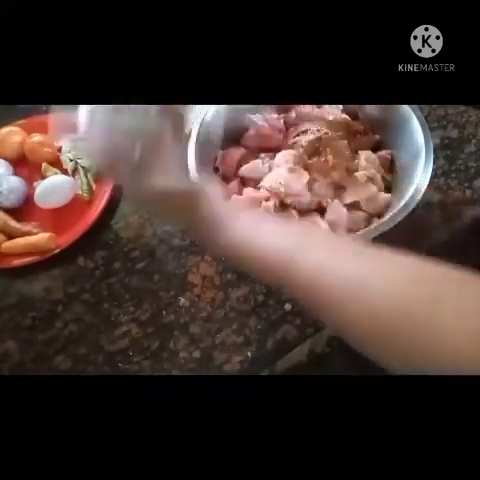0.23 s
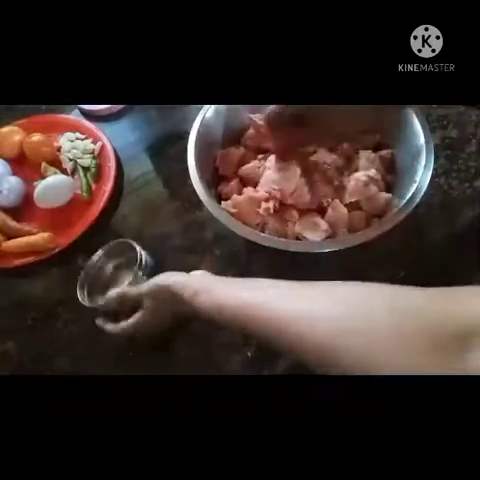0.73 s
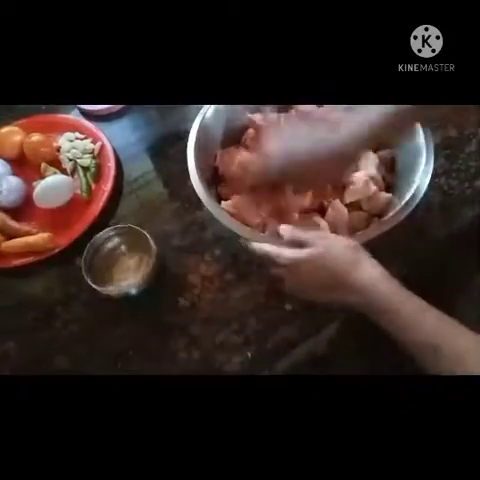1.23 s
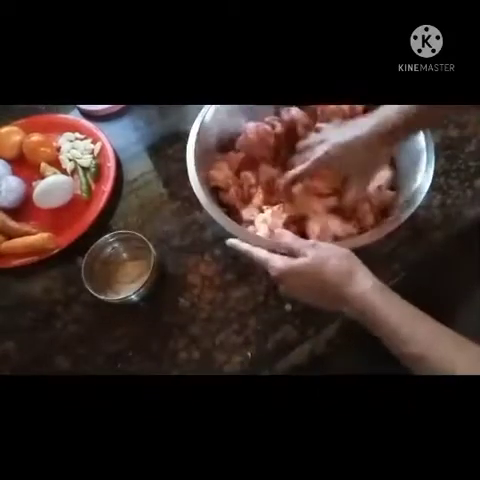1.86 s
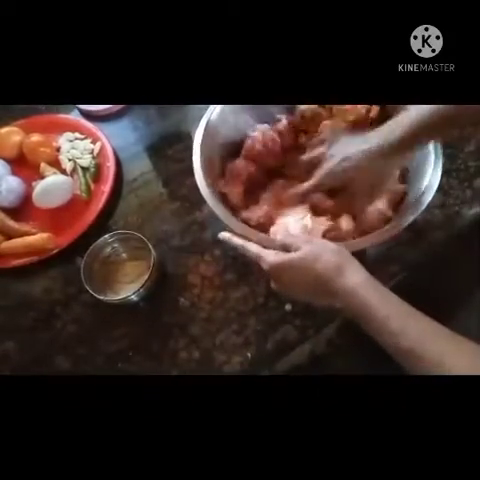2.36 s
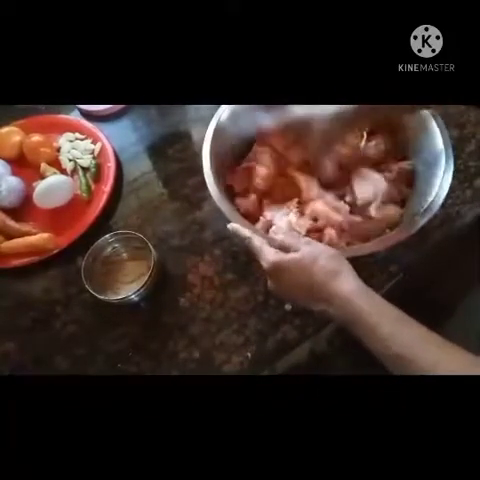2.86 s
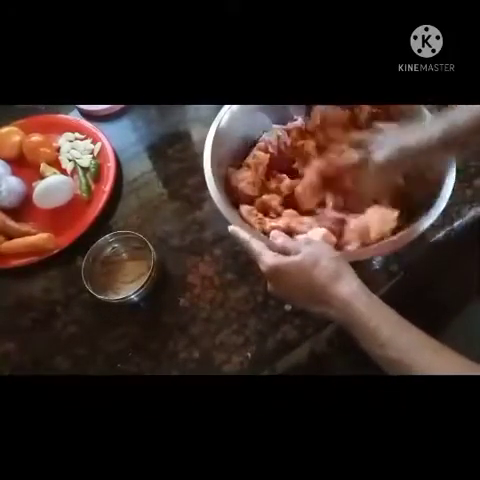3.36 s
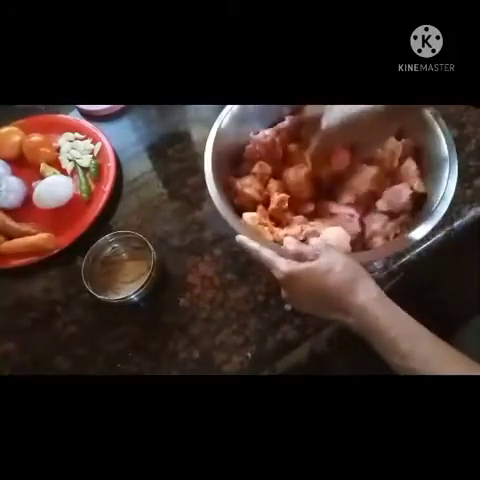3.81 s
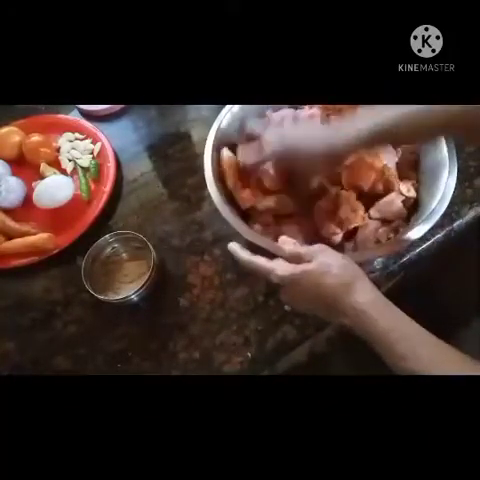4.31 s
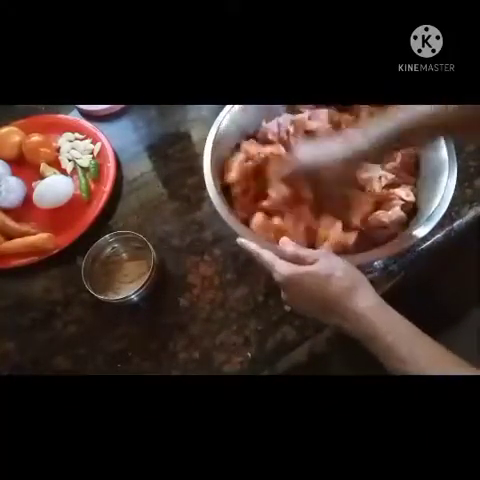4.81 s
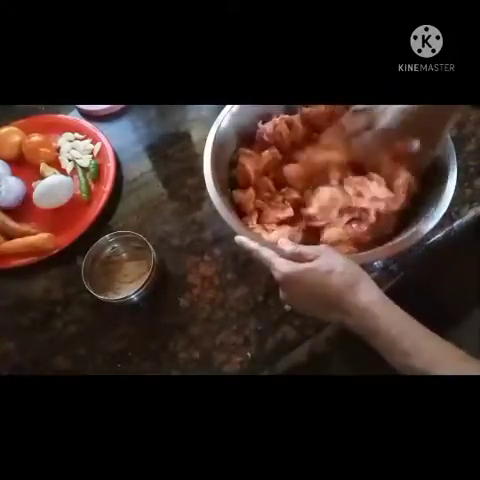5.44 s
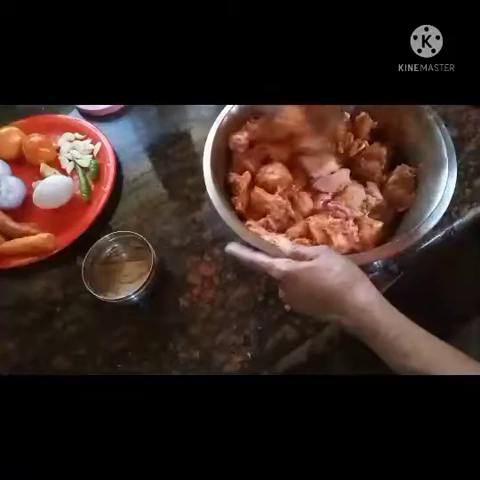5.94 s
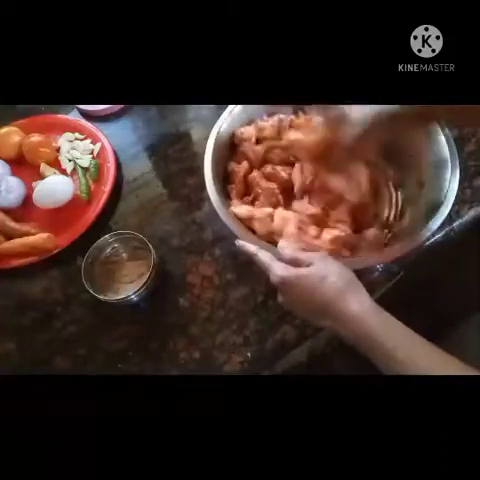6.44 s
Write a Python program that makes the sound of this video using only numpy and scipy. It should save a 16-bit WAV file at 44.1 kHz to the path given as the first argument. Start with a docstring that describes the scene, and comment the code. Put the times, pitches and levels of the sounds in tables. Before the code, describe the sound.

A small, hard-walled kitchen heard close to the counter, with quiet hiss and faint mains hum. At about 0.6 s come two little wet pops. At 0.82 s a steel dish hits stone with a loud, bright but short-ringing clang, bounces and chatters until 0.93 s, then scrapes on until 1.8 s, gritty and juddering with a wavering screech, catching harder around 1.5 to 1.77 s. From about 1.9 s hands work raw meat in wet paste: soft squishing, crackling bubbles, fizz, sticky slaps and rounded pops, in irregular strokes roughly two or three a second. Strong squelches fall near 2.4, 3.85, 4.85, 5.86 and 6.3 s. The heavy bowl gives a dull double knock around 5.76 s. A far engine fades in from 1.6 s, swelling briefly near 4.8 s, while low road rumble grows until 5.5 s and stays to the end.

```python
"""Kneading raw chicken

Raw chicken is mixed with wet paste by hand in a steel bowl on a stone counter, in a small hard-walled kitchen.
Two wet pops, then a steel dish clangs down and scrapes over the stone for a second: impacts and friction drive
its modes. The meat squelches and smacks stroke by stroke (ringing pockets, noise bursts); the bowl knocks dully.
Beneath lie hiss, mains hum, a far engine (wavering harmonics) and growing road rumble (filtered noise)."""
import sys
import numpy as np
from scipy import signal
from scipy.io import wavfile

SR = 44100
rng = np.random.default_rng(int(sys.argv[2]) if len(sys.argv) > 2 else 0)


def put_to_file(sound):
    """Save the sound as 16-bit audio at rate SR, in the file named by the first command-line argument."""
    columns = np.atleast_2d(sound).T  # one column per channel
    safe = np.clip(columns, -1, 1)
    whole_steps = np.round(safe * 32767)
    wavfile.write(sys.argv[1], SR, whole_steps.astype(np.int16))


N = 294147
T = np.arange(N) / SR


def from_db(db):
    """Decibels to amplitude gain."""
    return 10 ** (np.asarray(db) / 20)


def rms_one(x):
    """Scale to unit rms."""
    return x / np.sqrt(np.mean(x ** 2) + 1e-20)


def energy_one(x):
    """Scale to unit energy."""
    return x / np.sqrt(np.sum(x ** 2) + 1e-20)


def level_in_time(rows):
    """Interpolate (s, dB) rows to every sample."""
    s, db = np.transpose(rows)
    return np.interp(T, s, db)


def at_hz(points, hz):
    """Read (Hz, value) rows on a log-frequency axis."""
    f, value = np.transpose(points)
    return np.interp(np.log(np.maximum(hz, 1)), np.log(f), value)


def fade(t, t60):
    """Exponential decay by 60 dB in t60 seconds."""
    return np.exp(-np.log(1000) * t / t60)


def ramp(since_s, length_s):
    """Linear rise from 0 to 1, then hold."""
    return np.clip(since_s / length_s, 0, 1)


def add(out, s, sound):
    """Mix a short sound in at time s."""
    i = min(max(round(s * SR), 0), N)
    out[i:i + len(sound)] += sound[:N - i]


def through(x, response):
    """Convolve a signal with an impulse response."""
    return signal.oaconvolve(x, response)[:N]


def colour(spectrum, size=4096):
    """Minimum-phase, unit-energy response with the given spectrum."""
    hz = np.abs(np.fft.fftfreq(size, 1 / SR))
    log_gain = np.log(from_db(at_hz(spectrum, hz)))
    min_phase = np.exp(signal.hilbert(log_gain).conj())
    return energy_one(np.fft.ifft(min_phase).real[:size // 2])


def cut(x, hz, kind, order=2):
    """Butterworth low- or high-pass."""
    sos = signal.butter(order, min(hz, SR / 2 - 1), kind, fs=SR, output="sos")
    return signal.sosfilt(sos, x)


def drift(per_s):
    """Random curve: per_s unit-normal values a second, joined by straight lines."""
    return np.interp(T * per_s, np.arange(4096), rng.standard_normal(4096))


def grains(per_s, spread_db):
    """Random clicks of uneven size, unit rms."""
    sizes = from_db(spread_db * np.minimum(rng.exponential(1, N), 4))
    signs = rng.choice([-1, 1], N)
    return rms_one(sizes * signs * (rng.random(N) < per_s / SR))


def burst(t60, per_s, snap):
    """A contact lets go: one snap and a fading run of random clicks, unit energy."""
    t = T[:SR // 10]
    run = rng.standard_normal(len(t)) * (rng.random(len(t)) < per_s / SR) * fade(t, t60)
    run[0] = snap
    return energy_one(run)


# Kitchen decay. Each row: frequency in Hz, t60 in seconds.
KITCHEN_T60 = [(150, 0.87), (500, 0.34), (1400, 0.51), (3700, 0.21), (10000, 0.31)]


def kitchen(x, wet_db, count=9):
    """Hard walls return a dense noise tail, each band with its own decay; the lows last longest."""
    t = T[:SR * 2 // 3]
    edges_hz = np.geomspace(60, 18000, count + 1)
    tail = np.zeros(len(t))
    for low, high in zip(edges_hz, edges_hz[1:]):
        band = cut(cut(rng.standard_normal(len(t)), low, "high"), high, "low")
        tail += band * fade(t, at_hz(KITCHEN_T60, np.sqrt(low * high)))
    return x + from_db(wet_db) * through(x, energy_one(tail * ramp(t - .002, .0025)))


ENGINE_DB, ENGINE_START_S, ENGINE_RISE_S = -68.5, 1.57, 0.59
SWELL_S, SWELL_WIDTH_S, SWELL_DB = 4.8, .23, 13.5
ROAD_FAR_DB, ROAD_NEAR_DB = -73, -56
ROAD_APPROACH_S, ROAD_NEAR_S = 1.25, 5.45


def street_levels():
    """(engine dB, road dB): the engine rises 20 dB and swells once; traffic draws near, then stays."""
    running = np.clip((T - ENGINE_START_S) / ENGINE_RISE_S, .1, 1)
    swell_db = SWELL_DB * np.exp(-((T - SWELL_S) / SWELL_WIDTH_S) ** 2)
    engine_db = ENGINE_DB + 20 * np.log10(running) + swell_db
    return engine_db, np.interp(T, [ROAD_APPROACH_S, ROAD_NEAR_S], [ROAD_FAR_DB, ROAD_NEAR_DB])


ENGINE_HZ = 88.5
# Engine harmonics. Each row: multiple of ENGINE_HZ, relative level in dB.
ENGINE_ORDERS = [(1, -1), (2, -9), (3, -11.5), (4, -7)]
# Mains harmonics. Each row: frequency in Hz, rms level in dB.
MAINS = [(50, -94), (150, -79.5), (200, -78)]
# Spectra of road rumble and room hiss. Each row: frequency in Hz, relative level in dB per Hz.
ROAD_SPECTRUM = [(30, -31), (60, -6.5), (120, -3), (180, 4.5), (260, -1.5), (380, 6), (700, -3),
                 (1500, -46), (3000, -59)]
HISS_SPECTRUM = [(30, -17.5), (100, 5.5), (400, -12.5), (900, 0), (1450, -9), (2000, -8), (3200, -11.5),
                 (5200, -22), (7000, -14.5), (9000, -8.5), (11500, -29), (15500, -29)]


def background(hiss_db=-69):
    """Noise hiss, sine hum and engine harmonics that waver in pitch and level over filtered-noise rumble."""
    engine_db, road_db = street_levels()
    phase = 2 * np.pi * np.cumsum(ENGINE_HZ * (1 + 0.00588 * drift(6))) / SR
    engine, hum = np.zeros((2, N))
    for k, db in ENGINE_ORDERS:
        engine += np.sqrt(2) * from_db(db + 2.0 * drift(10)) * np.sin(round(k) * phase)
    for hz, db in MAINS:
        hum += np.sqrt(2) * from_db(db) * np.sin(2 * np.pi * hz * T)
    rumble = from_db(road_db) * through(rng.standard_normal(N), colour(ROAD_SPECTRUM))
    hiss = from_db(hiss_db) * through(rng.standard_normal(N), colour(HISS_SPECTRUM))
    return hiss + hum + rumble + from_db(engine_db) * engine


# Hand strokes. Each row: hardest squeeze in seconds, effort in relative dB, paste fizz in relative dB,
# build-up in seconds.
STROKES = [(1.99, -55.5, -59, .06), (2.44, -59, -56, .1), (2.79, -60, -54, .12), (3.33, -54, -58, .06),
           (3.57, -56, -52, .09), (3.82, -50, -59.5, .14), (4.26, -58.5, -61, .12), (4.45, -53, -60.5, .08),
           (4.84, -52, -65, .09), (5.39, -53.5, -61.5, .13), (5.8, -56, -59, .2), (6.3, -49, -52, .08),
           (6.62, -59, -66, .15)]
RELEASE_S = .09
REST_DB, REST_FIZZ_DB = -65.5, -68   # the hand keeps moving between strokes
KNEAD_START_S = 1.85


def stroke_levels():
    """(effort dB, fizz dB): bell-shaped squeezes sum in power over the resting level."""
    effort, fizz = from_db(REST_DB) ** 2, from_db(REST_FIZZ_DB) ** 2
    for s, effort_db, fizz_db, build_s in STROKES:
        grip = np.exp(-((T - s) / np.where(T < s, build_s, RELEASE_S)) ** 2)
        effort = effort + (from_db(effort_db) * grip) ** 2
        fizz = fizz + (from_db(fizz_db) * grip) ** 2
    return 10 * np.log10(effort), 10 * np.log10(fizz)


def pocket(hz, cycles, rise):
    """An air pocket opens and rings for a few cycles, rising in pitch."""
    t, life_s = T[:SR // 30], cycles / hz + 0.0027
    ring = np.sin(2 * np.pi * hz * t * (1 + rise * t / life_s))
    return ring * fade(t, life_s) * (1 - np.exp(-2 * hz * t))


SMALL_POP_DB, SMALL_SPRAY_DB, SMALL_RANGE_DB = 19.5, 4, 3   # most above effort, most above fizz, spread
SMALL_LOW_HZ, SMALL_HIGH_HZ = 1190, 4000


def small_squelches(count=60):
    """Small pockets burst at random, more often and louder at hard presses; rows as in SQUELCHES."""
    effort_db, fizz_db = stroke_levels()
    work = np.cumsum(from_db(effort_db / 2) * (T > KNEAD_START_S))
    when, size, pitch, wet = rng.random((count, 4)).T
    i = np.searchsorted(work, work[-1] * (np.arange(count) + when) / count)
    pop_db = effort_db[i] + SMALL_POP_DB - SMALL_RANGE_DB * size
    hz = SMALL_LOW_HZ * (SMALL_HIGH_HZ / SMALL_LOW_HZ) ** pitch
    spray_db = fizz_db[i] + SMALL_SPRAY_DB - SMALL_RANGE_DB * wet
    return list(zip(T[i], pop_db, hz, spray_db))


# Loudest wet pockets. Each row: burst in seconds, pop in relative dB, pop pitch in Hz, paste spray in relative dB.
SQUELCHES = [(0.6055, -43, 1260, -58.5), (0.6621, -38, 1580, -59), (1.998, -38, 1150, -47),
             (2.128, -34.5, 1710, -45.5), (2.244, -32.5, 1360, -70), (2.256, -30.5, 2260, -68),
             (2.313, -29, 2780, -48), (2.4172, -27.5, 1280, -41), (2.479, -35, 3920, -33.5),
             (2.608, -29, 2470, -51), (2.836, -31, 1100, -29), (2.969, -36, 3800, -58),
             (3.097, -37.5, 1050, -57), (3.237, -36, 1340, -52.5), (3.3578, -29.5, 1210, -38.5),
             (3.569, -32, 1100, -44), (3.716, -30, 680, -44), (3.792, -28.5, 1330, -61),
             (3.843, -24.5, 1070, -48.5), (3.887, -32, 2300, -52), (3.9146, -27, 1650, -36.5),
             (4.107, -30, 960, -39), (4.351, -35, 1340, -49.5), (4.407, -32.5, 2830, -48),
             (4.436, -27.5, 2080, -49.5), (4.481, -34, 1170, -48), (4.747, -32.5, 2380, -52),
             (4.774, -29, 2440, -35), (4.822, -26.5, 3660, -47), (4.867, -26, 1970, -46.5),
             (5.238, -30.5, 1090, -38.5), (5.253, -32, 980, -41), (5.858, -21, 1120, -46.5),
             (6.12, -26, 3230, -48), (6.297, -28, 710, -45.5), (6.313, -28.5, 1050, -50),
             (6.384, -25.5, 1020, -66)]
# Spectra of meat slap and paste spray. Each row: frequency in Hz, relative level in dB per Hz.
SLAP_SPECTRUM = [(90, -12.5), (300, -5), (650, -4.5), (1100, 1.5), (1700, -1), (2500, 2), (3500, -8),
                 (6000, -35)]
SPRAY_SPECTRUM = [(900, -30), (2500, 3), (3700, 13), (5200, 1.5), (7000, -3.5), (8800, 0.5), (12500, -23),
                  (15400, -14)]
SLAP_WETNESS = 0.33   # share of slap dB that follows the spray; the rest follows the pop


def squelches(slap_db=14, spray_db=19, cycles=7.65, follow_db=-10, scatter_octaves=1, tear_db=-13, count=3):
    """The paste tears, a pocket pops and sets off smaller ones, the meat slaps and sprays."""
    pops, slaps, sprays = np.zeros((3, N))
    for s, pop_db, hz, paste_db in SQUELCHES + small_squelches():
        add(pops, s, from_db(pop_db) * pocket(hz, cycles, rise=0.11))
        for late, size in rng.random((count, 2)):
            follower = pocket(hz * 2 ** (scatter_octaves * (2 * size - 1)), cycles, rise=0.088)
            add(pops, s + 0.024 * late, from_db(pop_db + follow_db - 2.8 * late) * follower)
        meat_db = pop_db + SLAP_WETNESS * (paste_db - pop_db) + slap_db
        tearing = burst(0.063, 680, snap=0.23)[::-1]   # swells up to the pop
        add(slaps, s - len(tearing) / SR, from_db(meat_db + tear_db) * tearing)
        add(slaps, s, from_db(meat_db) * burst(0.06, 2400, snap=0.62))
        add(sprays, s, from_db(paste_db + spray_db) * burst(0.014, 3000, snap=0.34))
    wet = through(slaps, colour(SLAP_SPECTRUM)) + through(sprays, colour(SPRAY_SPECTRUM))
    return cut(pops, 250, "high") + wet


# Dish modes. Each row: frequency in Hz, struck level in relative dB, rubbed level in relative dB,
# undamped t60 in seconds.
DISH_MODES = [(352, -28, -26, .16), (635, -40, -19, .16), (711, -9, -28, .28), (765, -28, -22, .2),
              (1017, -9, -10, .28), (1048, -12, -12, .26), (1250, -17, -15, .15), (1432, -26, -14, .18),
              (1526, -22, -18, .2), (1565, -19, -31, .24), (1755, -23, -19, .18), (1886, -15, -6, .2),
              (2176, -20, -10, .06), (2250, -25, -18, .16), (2376, -16, -22, .18), (2512, -15, -21, .18),
              (2785, -4, -19, .23), (2896, -15, -35, .18), (3214, -28, -13, .13), (3725, -22, -28, .14),
              (3975, -19, -22, .05), (4102, -20, -35, .12), (4378, -40, -28, .07), (6100, -45, -29, .06),
              (7080, -50, -34, .03), (7660, -49, -26, .014), (8540, -32, -31, .04), (9030, -32, -25, .018),
              (10500, -37, -32, .01)]


def steel(column, body, ring_db, body_db, crack_db, body_t60, damping=1):
    """Response of the dish: a crack, a quickly dying crowd of modes and the long ring."""
    t = T[:SR // 2]
    modes = np.zeros(len(t))
    for k, row in enumerate(DISH_MODES):
        ring = np.sin(2 * np.pi * row[0] * t) * fade(t, row[3] * damping)
        modes += (-1) ** k * from_db(row[column]) * energy_one(ring)
    crowd = from_db(body_db) * energy_one(rng.standard_normal(len(t)) * fade(t, body_t60))
    crowd[0] += from_db(crack_db)
    crowd = signal.fftconvolve(crowd, colour(body))[:len(t)]
    return from_db(ring_db) * cut(modes, 237, "high") + crowd


# Dish hits the stone and bounces. Each row: start in seconds, force in dB.
DISH_BLOWS = [(0.8217, 18), (.8283, 6), (.8421, 10.5)]
# Rim chatter. Each row: time in seconds, force in dB.
SETTLE = [(.845, -63), (.858, -17), (.89, -27.5), (.905, -18.5), (.93, -66)]
# Crowd of struck modes. Each row: frequency in Hz, relative level in dB per Hz.
STRUCK_BODY = [(90, -53), (250, -29.5), (500, -11.5), (900, -3), (2400, -2.5), (3000, 1), (3500, -12),
               (4200, -8), (5300, -31.5), (9000, -55), (11500, -32.5), (15000, -32.5)]


def clang(thud_db=-55, thud_hz=95, thud_t60=.5):
    """The dish lands, bounces and chatters to rest; the counter answers with a faint thud."""
    chattering = (T > SETTLE[0][0]) * (T < SETTLE[-1][0])
    force = from_db(level_in_time(SETTLE)) * grains(1500, 0.82) * chattering
    for s, db in DISH_BLOWS:
        add(force, s, from_db([db]))
    since = np.maximum(T - DISH_BLOWS[0][0], 0)
    thud = from_db(thud_db) * np.sin(2 * np.pi * thud_hz * since)
    thud *= fade(since, thud_t60) * (1 - fade(since, .15))
    struck = steel(1, STRUCK_BODY, ring_db=-3.5, body_db=-5.0, crack_db=-11.0, body_t60=0.039)
    return thud + through(force, struck)


SLIDE_START_S, SLIDE_END_S = 0.83, 1.795


def slide_gate(attack_s, release_s):
    """1 while the dish slides, with linear ends."""
    return ramp(T - SLIDE_START_S, attack_s) * ramp(SLIDE_END_S - T, release_s)


# Rim catches. Each row: start in seconds, jolt in dB, grinding in relative dB.
DISH_CATCHES = [(1.0113, -11, -49), (1.326, -7, -52), (1.375, -15, -46), (1.5348, 1, -47),
                (1.606, -2.5, -49), (1.674, -1.5, -50), (1.7211, 4.5, -54), (1.729, 4, -61),
                (1.769, -1, -68)]
GRIT_DB, GRIT_GAIN_DB_PER_S = -54.5, 1.5   # relative level at slide start, growth
CATCH_S = 0.012


def grit_level():
    """Grit gain grows along the slide and surges wherever the rim catches."""
    level = from_db(GRIT_DB + GRIT_GAIN_DB_PER_S * (T - SLIDE_START_S))
    for s, _, db in DISH_CATCHES:
        level += from_db(db) * np.exp(-((T - s - CATCH_S / 2) / CATCH_S) ** 2)
    return level


# Pressure on the stone. Each row: time in seconds, relative level in dB.
PRESSURE = [(.95, -35), (1.0, -26.5), (1.07, -30.5), (1.25, -33), (1.36, -30.5), (1.57, -33), (1.61, -27),
            (1.785, -36)]
# Crowd of rubbed modes. Each row: frequency in Hz, relative level in dB per Hz.
RUBBED_BODY = [(90, -28), (230, -18), (360, -6.5), (480, -8), (650, 1), (900, -4), (1600, -2.5),
               (2400, 1.5), (3000, 1), (3500, -8.5), (4200, -3.5), (5300, -32.5), (9000, -24), (12000, -40),
               (15000, -40)]
CONTACT_DAMPING = 0.59   # share of mode t60 left while pressed on the stone


def scrape(slide_db=-1, grit_db=-3, judder_db=3.5):
    """Stick-slip of the rim on the stone drives the steel; grit reaches only the high modes."""
    rubbed = steel(2, RUBBED_BODY, ring_db=-1.5, body_db=-5.0, crack_db=-8.5, body_t60=0.037,
                   damping=CONTACT_DAMPING)
    sliding = slide_gate(0.024, 0.012) * from_db(judder_db * drift(70))
    stick_slip = cut(grains(3500, 2.8), 3680, "low")
    force = sliding * from_db(level_in_time(PRESSURE) + slide_db) * stick_slip
    for s, db, _ in DISH_CATCHES:
        add(force, s, from_db(db) * burst(0.094, 1500, snap=0.5))
    grit = sliding * from_db(grit_db) * grit_level() * grains(1500, 2.4)
    high_modes = energy_one(cut(rubbed, 6200, "high", order=8))
    return through(force, rubbed) + through(grit, high_modes)


def screech(screech_db=-8, centre_hz=2200, wander_octaves=.11, width_hz=70, flutter_db=3):
    """The sliding contact screeches: a noise-modulated sine whose pitch wanders with the grip of the stone."""
    phase = 2 * np.pi * np.cumsum(centre_hz * 2 ** (wander_octaves * drift(28))) / SR
    rough = rms_one(cut(rng.standard_normal(N), width_hz, "low"))
    level_db = level_in_time(PRESSURE) + screech_db + flutter_db * drift(22.45)
    return slide_gate(.04, .02) * from_db(level_db) * rough * np.sin(phase)


def bubbles(low_hz, high_hz, cycles, range_db, count):
    """Tiny bubbles open at random moments, each at its own pitch; unit rms."""
    out = np.zeros(N)
    for when, size, force in rng.random((count, 3)):
        hz = low_hz * (high_hz / low_hz) ** size
        add(out, when * T[-1], from_db(-range_db * force) * pocket(hz, cycles, rise=0.14))
    return rms_one(cut(out, low_hz / 2, "high"))


# Spectrum of sliding meat. Each row: frequency in Hz, relative level in dB per Hz.
SQUISH_SPECTRUM = [(120, -36), (400, -4.5), (700, -3), (1150, 0.5), (1700, -10), (2400, -5.5), (3500, -7.5),
                   (5500, -29)]


def kneading(squish_db=-5, bubble_db=-3, fizz_db=-9, tick_db=-11, clump_db=5.5):
    """Sliding pieces crackle in clumps and free bubbles; the paste fizzes and ticks."""
    effort_db, paste_db = stroke_levels()
    working = ramp(T - KNEAD_START_S, 0.03) * from_db(clump_db * drift(45))
    squish = from_db(squish_db) * through(grains(1500, 3.6), colour(SQUISH_SPECTRUM))
    squish += from_db(bubble_db) * bubbles(863, 4350, cycles=16.6, range_db=10.5, count=320)
    fizz_response = energy_one(cut(colour(SPRAY_SPECTRUM), 2600, "high"))
    fizz = from_db(fizz_db) * through(grains(1700, 4.6), fizz_response)
    fizz += from_db(tick_db) * bubbles(3900, 11460, cycles=7.8, range_db=29.0, count=450)
    return working * (from_db(effort_db) * squish + from_db(paste_db) * fizz)


# Loaded bowl rocks on the counter. Each row: start in seconds, force in dB.
BOWL_KNOCKS = [(5.752, -49), (5.7585, -31), (5.7605, -24), (5.7649, -30), (5.772, -49), (5.7907, -34.5),
               (5.803, -48), (5.8577, -45.5)]
# Bowl modes damped by the meat. Each row: frequency in Hz, level before filtering in dB, t60 in seconds.
BOWL_MODES = [(670, -34, 0.061), (816, 1, 0.043), (1027, -6, 0.042), (1246, -1, 0.028), (1750, -3, 0.015),
              (1935, 0, 0.012), (2170, 0, 0.026)]


def bowl():
    """Impulses ring the full bowl's short modes, band-limited to a dull knock."""
    force, t = np.zeros(N), T[:SR // 4]
    for s, db in BOWL_KNOCKS:
        add(force, s, from_db([db]))
    ring = sum(from_db(db) * np.sin(2 * np.pi * hz * t) * fade(t, t60) for hz, db, t60 in BOWL_MODES)
    knocks = cut(through(force, ring), 820, "high", order=3)
    return cut(knocks, 3200, "low", order=4)


def scene():
    """Dish, meat and bowl sound in the kitchen over the background."""
    dish = clang() + scrape() + screech()
    meat = squelches() + kneading() + bowl()
    return (kitchen(dish, wet_db=-6) + kitchen(meat, wet_db=-3) + background())[None]


CUTOFF_HZ = 15700


def record(dry):
    """Loud peaks are rounded by soft saturation; a steep low-pass removes the top."""
    rounded = .8 * np.tanh(dry / .8)
    sos = signal.ellip(10, .1, 80, CUTOFF_HZ, fs=SR, output="sos")
    return signal.sosfilt(sos, rounded)


dry = scene()
out = record(dry)
put_to_file(out)
```